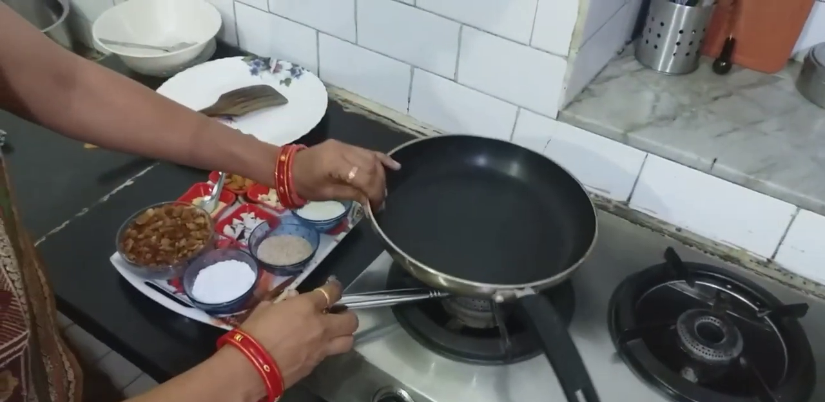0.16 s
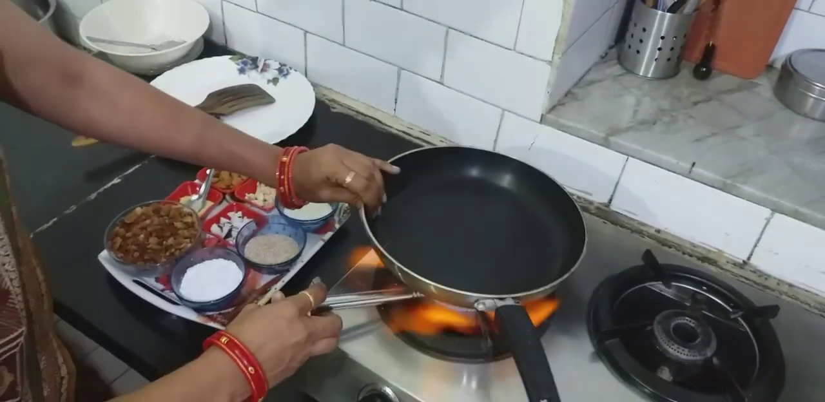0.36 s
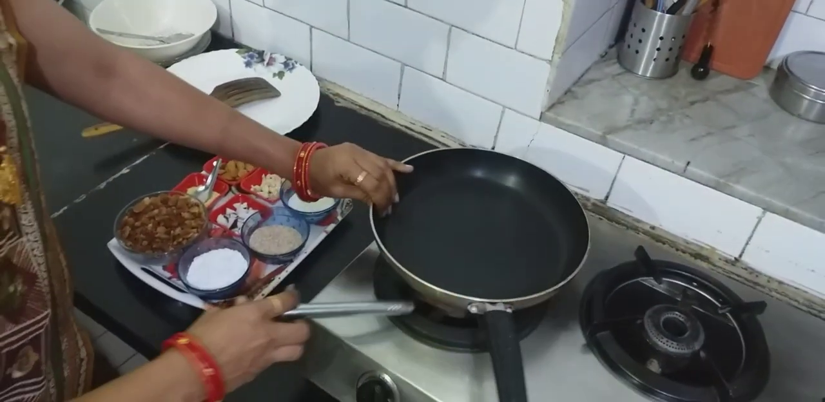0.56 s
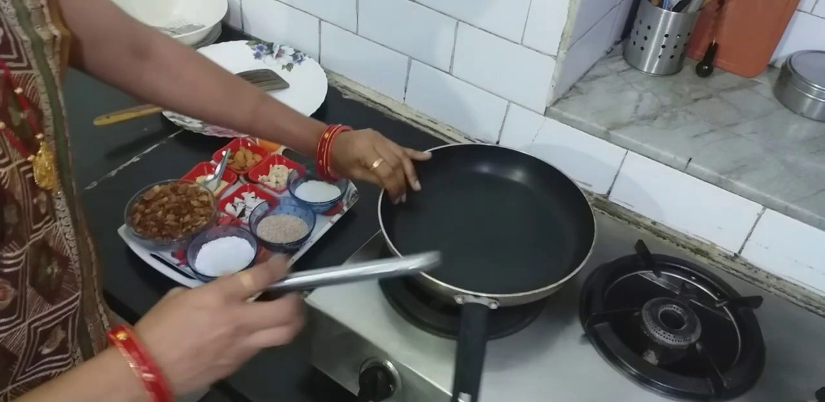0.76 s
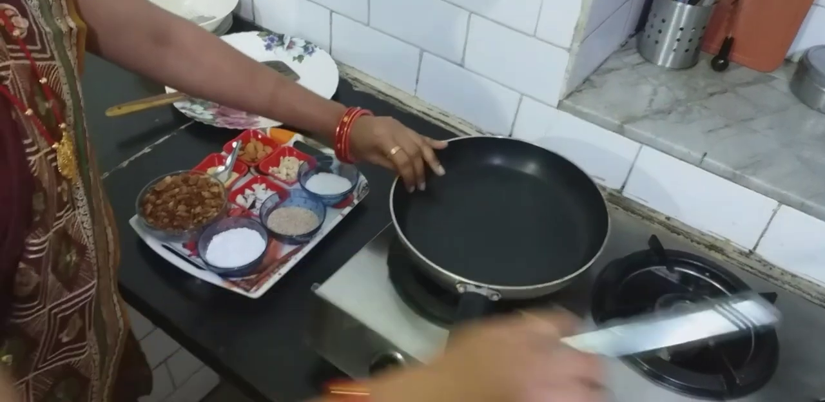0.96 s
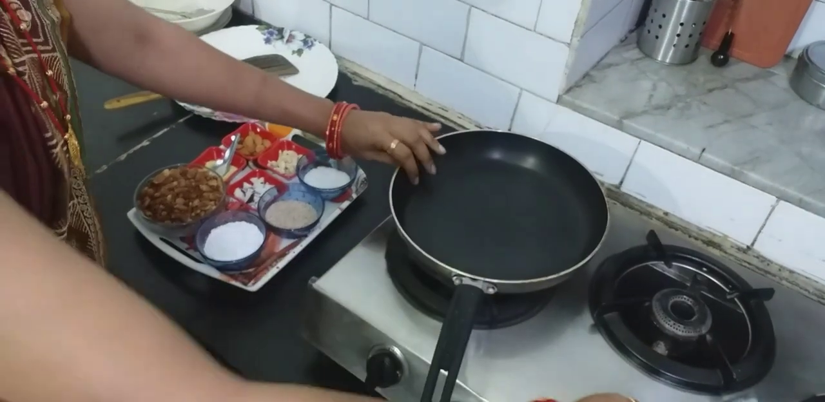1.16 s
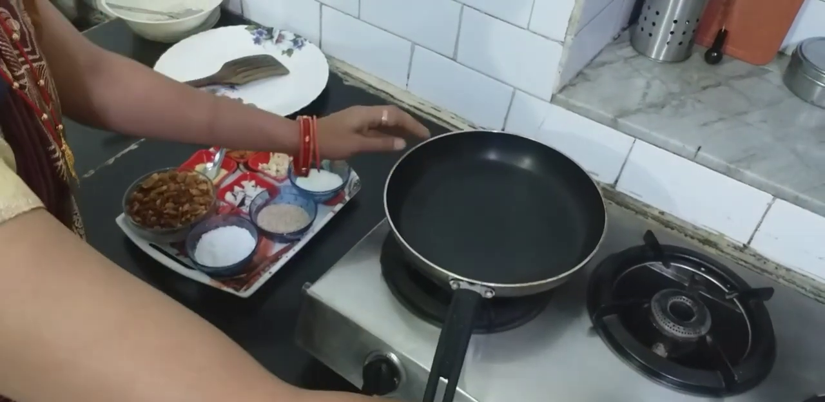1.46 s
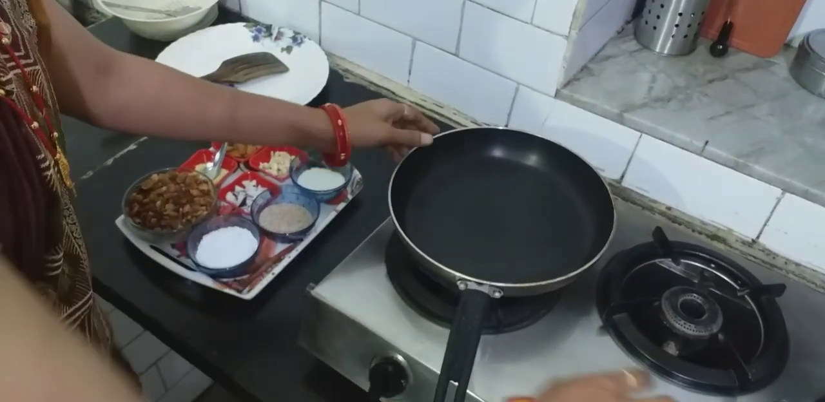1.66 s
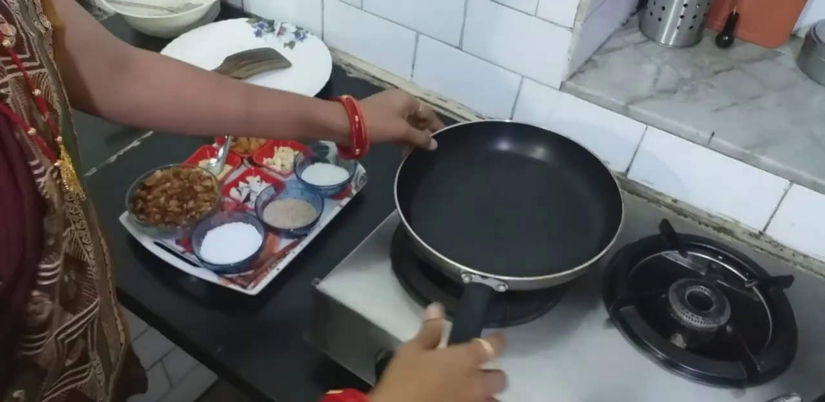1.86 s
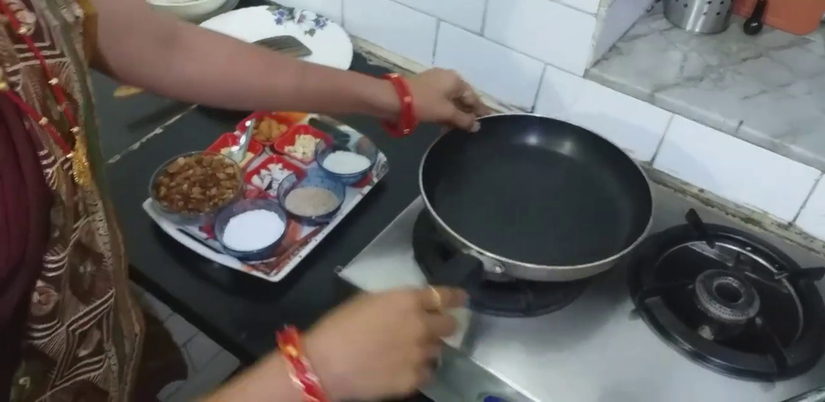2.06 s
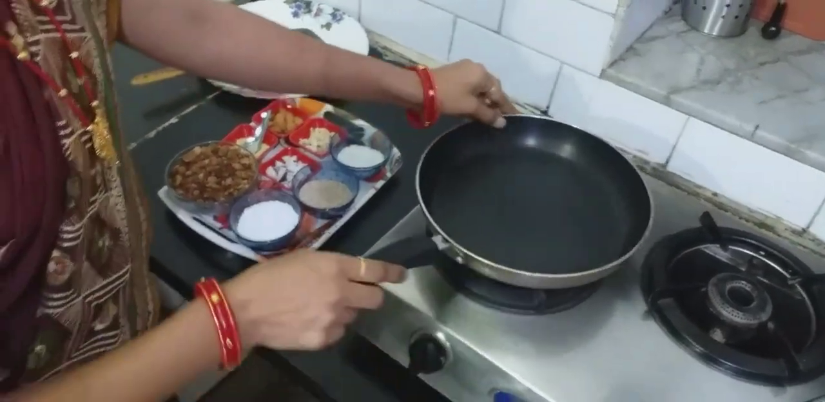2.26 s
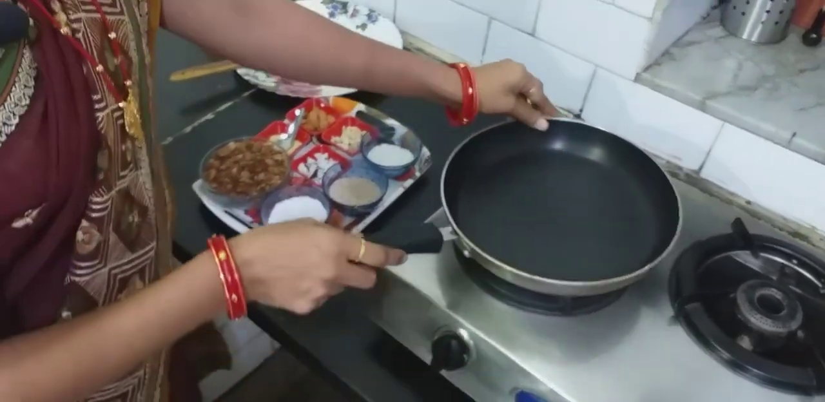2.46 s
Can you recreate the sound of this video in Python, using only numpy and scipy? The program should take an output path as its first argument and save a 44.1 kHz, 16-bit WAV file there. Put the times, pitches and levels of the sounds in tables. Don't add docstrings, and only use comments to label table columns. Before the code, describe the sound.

Frying pan knocking and scraping on a metal stove grate, after a sharp lighter click and gas puff

```python
import sys
import numpy as np
from scipy import signal
from scipy.fft import rfft, irfft
from scipy.io import wavfile
from scipy.ndimage import uniform_filter1d

SR = 44100
rng = np.random.default_rng(int(sys.argv[2]) if len(sys.argv) > 2 else 0)


def volts_from_decibels(level):
    exponent = np.asarray(level, float) / 20
    return 10 ** exponent


def inscribe(sig):
    pcm = np.round(np.clip(np.atleast_2d(sig).T, -1, 1) * 32767)
    wavfile.write(sys.argv[1], SR, pcm.astype(np.int16))


N = 114660

# frequency in Hz, level in dB.
FLOOR_TONE = [(18, -44.5), (30, -1), (221, 10), (415, -6), (600, 2), (1460, -7.5), (6720, -10), (8980, -15),
              (16000, -22.5)]
# time in seconds, level in dB.
FLOOR_LEVEL = [(0, 11.5), (.6, 15), (.95, 5), (1.28, -2.5), (1.32, 9.5), (2.3, 19.5), (2.6, 14.5)]
FLOOR_DB = -70

# start in seconds, length in seconds, level in dB, start and end pitch in Hz.
CHIRPS = [
    (.765, .12, -70, 2250, 1700),
    (1.04, .085, -73, 2200, 1700),
]
CHIRP_HARMONICS = [-13, 0, -12]

# frequency in Hz, level in dB, t60 in seconds.
STOVE_MODES = [(98.3, -7, 0.69), (117.7, -2, 0.61), (148.9, -5, 1.2), (187, 3, 0.39), (318, -8, 1.38),
               (442, -13, 0.33), (685.5, -6.5, 0.42)]
# start in seconds, level in dB.
STOVE_BLOWS = [
    (.215, -33),
    (.25, -37),
    (0.289, -40.5),
    (0.352, -43),
    (1.949, -53),
    (2.0647, -71),
]

# time in seconds, level in dB.
GAS_LEVEL = [
    (0, -55.5),
    (.08, -51.5),
    (.19, -58),
    (.26, -72.5),
    (.4, -89.5),
]
# frequency in Hz, level in dB.
GAS_TONE = [(24, -44.5), (40, -4.5), (99, 5), (329, -5.5), (503, -28), (646, -4.5), (1410, -20), (4240, 0),
            (16000, -48.5)]
# time in seconds, level in dB.
PUFF_LEVEL = [
    (.205, -58),
    (.235, -46),
    (.26, -29),
    (.3, -29.5),
    (.36, -51),
    (.6, -61.5),
    (.9, -61),
]
# frequency in Hz, level in dB.
PUFF_TONE = [(15, -50), (25, -13), (48, -16), (188, -12), (331, -23.5), (352, -53), (436, -13.5),
             (500, -26.5), (650, -45.5), (1100, -120)]

# start in seconds, level in dB, rattle in seconds, tilt in dB per octave.
SNAPS = [
    (.2045, -18.5, .00025, 3),
    (.2135, -23, 0.0042, -2),
    (.227, -32.5, 0.0014, 4.5),
]
# frequency in Hz, level in dB.
SNAP_TONE = [(180, -27), (450, -2.5), (1400, -14), (3600, -7), (5500, -5), (7500, -2), (9500, -9),
             (16000, -15)]
# start in seconds, level in dB, rattle in seconds, tilt in dB per octave.
LAID = [
    (1.3016, -36.5, 0.0038, 1),
    (1.333, -42, 0.00064, -4.5),
    (1.411, -45, 0.0031, -3.5),
]
# frequency in Hz, level in dB.
LAID_TONE = [(200, -24.5), (722, -0.5), (1000, -1.5), (2100, -10.5), (3000, -19.5), (4000, -8.5),
             (6050, -31), (7680, -17.5), (16000, -23.5)]
# start in seconds, level in dB, rattle in seconds, tilt in dB per octave.
FALL = [
    (1.53, -28.5, 0.0019, 2),
    (1.5319, -23.5, 0.00063, 1),
    (1.5339, -24.5, 0.001, 1),
    (1.5363, -23, 0.00074, -1),
    (1.5391, -24.5, 0.0019, -1),
    (1.755, -35, 0.0028, -1),
]
# frequency in Hz, level in dB.
FALL_TONE = [(59, -34), (234, -8), (836, -6.5), (1900, -10), (4100, -7.5), (7450, -13), (13000, -17.5),
             (16000, -21.5)]
# start in seconds, level in dB, rattle in seconds, tilt in dB per octave.
BANGLES = [
    (.52, -57.5, 0.003, 5.5),
]
# frequency in Hz, level in dB, t60 in seconds.
FALL_RING_MODES = [(528, -6.5, 0.82), (641, 7, 0.23), (838, 2.5, 0.52), (1052, 1, 0.38), (1157, -0.5, 0.56),
                   (1701, -4, 0.67), (2730, -18, 0.55), (3480, -1.5, 0.35), (3905, 1.5, 0.39),
                   (4129, -5, 0.28), (4730, -12, 0.31), (5080, -4, 0.22), (5200, -10, .3)]

# time in seconds, level in dB.
DRAG_PRESSURE = [
    (1.875, -72),
    (1.9, -49),
    (2.05, -50),
    (2.09, -47),
    (2.13, -49),
    (2.185, -39.5),
    (2.22, -65),
    (2.3, -73),
    (2.36, -49),
]
# frequency in Hz, width in Hz, level in dB.
DRAG_MODES = [(592, 86, -6), (860, 30, -5), (1880, 45, -8), (2230, 60, -6), (3050, 60, -3), (3990, 90, -3),
              (4880, 100, -6), (5980, 150, -9), (6850, 35, -10), (8660, 60, -15), (10100, 110, -18),
              (11700, 67, -14), (13500, 51, -16), (15400, 35, -16)]
GRIT_PER_S, GRIT_SPREAD_DB = 560, 1.5
RASP_DB, FLARE_DB = -4, 3
TREBLE_FROM_S, TREBLE_HZ = 1.99, 6500

# start in seconds, level in dB, tilt in dB per octave.
CLANKS = [
    (0.3522, -31.5, -1),
    (.367, -38.5, 4.5),
    (0.7052, -53.5, -7),
    (1.879, -41.5, 0.5),
    (1.8847, -36.5, -2),
    (1.935, -47, 0),
    (1.9504, -37.5, 0.5),
    (2.0667, -34.5, -3.5),
    (2.109, -42.5, -5.5),
    (2.3445, -41, -2),
]
# frequency in Hz, level in dB.
KNOCK_TONE = [(59, -27.5), (130, -15), (406, -5), (705, -4), (2860, -5.5), (7500, -13), (9500, -24),
              (16000, -40.5)]
KNOCK_S = 0.0011
# frequency in Hz, level in dB, t60 in seconds, twin offset in Hz,
# twin level in dB, first swell of the beat in seconds.
PAN_MODES = [(1545, -6, .5, 9, -6, 0), (1907, -8, .42, -14, -6, 0), (2206, -1.5, .5, 8, -1, .042),
             (2686, -10, .48, -7, -6, .02), (3039, 2, .46, 11, -7, 0), (3497, -10, .4, 12, -6, .03),
             (3960, -9, .45, -21, -4, 0), (4633, -9, .42, 10, -6, .03), (4960, -10, .52, -93, -2, 0),
             (5911, -7, .48, -34, -5, 0), (6165, -7, .46, -28, -1, 0), (7227, -8, .36, -19, -4, .02),
             (10250, -18, .17, -190, -6, 0), (11820, -18, .17, -30, -6, 0)]
PAN_DB = -23
# start in seconds, frequency in Hz, level in dB, t60 in seconds.
TOUCHES = [(.3523, 695, -39, 0.47), (.3523, 852, -41, 0.33), (0.3525, 1073, -41, 0.24),
           (.575, 5990, -50.5, 0.1), (.615, 7667, -55, 0.12), (.7045, 675.5, -52, .5),
           (.712, 561, -53.5, 0.6), (1.8843, 4000, -36.5, 0.21), (1.8843, 2254, -36, 0.078),
           (1.8843, 1920, -37, 0.17), (1.8843, 6080, -40.5, 0.23), (1.894, 6090, -35, 0.068),
           (1.894, 4100, -33, 0.11), (1.9, 689, -39.5, 0.15), (1.934, 5800, -37, 0.15),
           (1.938, 3990, -36, 0.096), (1.951, 3020, -40.5, 0.62), (1.951, 2196, -37, 0.21),
           (1.951, 4160, -34, 0.05), (1.951, 313, -45.5, 0.53), (1.951, 1529, -43.5, 0.35),
           (1.955, 445, -39.5, 0.18), (1.97, 700.4, -38.5, 0.3), (2.0664, 534, -34, 0.21),
           (2.0664, 664, -36.5, 0.25), (2.0664, 847, -38, 0.32), (2.0664, 985, -38.5, 0.27),
           (2.0664, 1136, -38, 0.085), (2.0664, 1674, -39.5, 0.11), (2.0664, 1846, -35.5, 0.18),
           (2.0664, 320, -48.5, 1.6), (2.109, 587, -36.5, 0.1), (2.18, 4850, -40.5, 0.21),
           (2.005, 3050, -42.5, 0.43), (2.058, 3086, -40, .2), (2.21, 3050, -46, 0.22),
           (2.01, 2210, -40, .2), (2.15, 6860, -49, 0.21), (2.185, 3950, -48, 0.22),
           (2.3442, 655, -48.5, 0.22), (2.3442, 4250, -37, 0.038), (2.3442, 2140, -41.5, 0.051)]
# start in seconds, level in dB, rattle in seconds,
# tilt in dB per octave.
TICKS = [
    (1.501, -51.5, 0.0022, 0),
    (1.531, -18.5, 0.0057, 4.5),
    (1.757, -39, .01, 5),
    (1.95, -53, 0.0027, -1),
    (2.3442, -49.5, 0.005, 1),
]
TICK_WET_DB = 0.5
FREE_WET_DB, FREE_BUZZ = -13, .2
BUZZ = .6

RISE_S = .0015
SPLIT, TWIN_DB = .005, -6
RING_WET_DB = -10

# frequency in Hz, t60 in seconds.
ROOM = [(60, 1), (250, 0.4), (700, 0.85), (2000, 0.62), (5000, 0.43), (9000, 0.31), (15000, 0.25)]
WET_DB, FIRST_ECHO_S, BUILD_S = 8.5, 0.0005, 0.00088
LATE_DB, LATE_STRETCH = -22.5, 1.9

# frequency in Hz, level in dB.
MIC = [(30, -26), (62, -3), (6500, -0.5), (7800, 2), (9200, -8), (10500, -1), (15700, 1), (16100, -40)]
# frequency in Hz, level in dB.
SIDE_TONE = [(4000, -5.5), (15000, -6)]
# frequency in Hz, share from 0 to 1.
SIDE_SHARE = [(4500, 0), (6000, 0.06), (8500, 0.01), (12000, .45), (15000, .5)]


def evened(x):
    return x / np.sqrt(np.mean(x ** 2) + 1e-20)


def wobble(count, size):
    return evened(uniform_filter1d(rng.standard_normal(count), size=size))


def read(points, hz):
    f, value = np.transpose(points)
    return np.interp(np.log(hz + 1), np.log(f + 1), value)


def level(points):
    s, db = np.transpose(points)
    return volts_from_decibels(np.interp(np.arange(N) / SR, s, db, left=-150, right=-150))


def add(mix, s, sound):
    part = mix[round(s * SR):][:len(sound)]
    part += sound[:len(part)]


def colour(tone, tilt_db=0.):
    hz = np.abs(np.fft.fftfreq(8192, 1 / SR))
    log_gain = np.log(volts_from_decibels(read(tone, hz) + tilt_db * np.log2((hz + 500) / 2000)))
    taps = np.fft.ifft(np.exp(np.conj(signal.hilbert(log_gain)))).real
    if abs(taps[1]) <= abs(taps[-1]):
        taps = np.roll(taps[::-1], 1)
    taps = taps[:4096]
    return taps / np.linalg.norm(taps)


def noise(tone):
    hiss = signal.oaconvolve(rng.standard_normal(N + 4096), colour(tone))
    return evened(hiss[4096:N + 4096])


def resonate(x, hz, width):
    pole = np.exp((2j * np.pi * hz - np.pi * width) / SR)
    return 2 * signal.lfilter([1 - abs(pole)], [1, -pole], x).real


def in_room(x, wet_db=WET_DB):
    hz, _, z = signal.stft(rng.standard_normal(SR), SR, nperseg=256)
    t = np.arange(z.shape[1]) * 128 / SR
    t60 = read(ROOM, hz)[:, None]
    z = z * (volts_from_decibels(-60 * t / t60) + volts_from_decibels(LATE_DB - 60 * t / (LATE_STRETCH * t60)))
    tail = signal.istft(z, SR, nperseg=256)[1]
    tail = tail * np.clip((np.arange(len(tail)) / SR - FIRST_ECHO_S) / BUILD_S, 0, 1)
    tail = volts_from_decibels(wet_db) * tail / np.linalg.norm(tail)
    tail[0] = 1
    return signal.fftconvolve(x, tail)


def knock(db, rattle_s, tone, tilt_db):
    fade = np.exp(-np.arange(2048) / SR / rattle_s)
    spread = rfft(rng.standard_normal(len(fade)) * fade)
    burst = irfft(spread / abs(spread)) * fade ** (1 / 3)
    burst = burst / np.linalg.norm(burst)
    return volts_from_decibels(db + 22.5) * signal.fftconvolve(burst, colour(tone, tilt_db))


def ring(modes, db, uneven_db=0., lasting=0.86):
    t = np.arange(int(SR * lasting * 3 / 4))[:, None] / SR
    hz, mode_db, t60, *twin = np.transpose(modes)
    luck = rng.standard_normal((len(modes), 2))
    offset, twin_db, swell_s = twin or (hz * SPLIT * luck[:, 1], TWIN_DB, 0)
    pair = np.sin(2 * np.pi * hz * t)
    pair = pair + volts_from_decibels(twin_db) * np.sin(2 * np.pi * (hz * t + offset * (t - swell_s)))
    rise = 1 - np.exp(-t / RISE_S)
    decay = np.exp(-np.log(1000) * t / (lasting * t60))
    return (pair * rise * decay) @ volts_from_decibels(db + mode_db + uneven_db * luck[:, 0])


def room_floor():
    return volts_from_decibels(FLOOR_DB) * level(FLOOR_LEVEL) * noise(FLOOR_TONE)


def bird():
    out = np.zeros(N)
    for s, length, db, start_hz, end_hz in CHIRPS:
        u = np.arange(0, length, 1 / SR) / length
        flutter = 1 + .03 * wobble(8820, 90)[:len(u)]
        pitch = start_hz + (end_hz - start_hz) * u ** (4 / 3)
        turns = np.cumsum(flutter * pitch) / SR
        call = sum(volts_from_decibels(p) * np.sin(2 * np.pi * (k + 1) * turns) for k, p in enumerate(CHIRP_HARMONICS))
        add(out, s, in_room(volts_from_decibels(db - 13.0) * call * np.sin(np.pi * u), 23.8))
    return out


def stove():
    out = np.zeros(N)
    for s, db in STOVE_BLOWS:
        add(out, s, ring(STOVE_MODES, db, uneven_db=0.92))
    return out


def burner():
    sputter = volts_from_decibels(2.0 * wobble(N, 150))
    hiss = level(GAS_LEVEL) * noise(GAS_TONE) * sputter
    return hiss + level(PUFF_LEVEL) * noise(PUFF_TONE)


def lighter():
    out = np.zeros(N)
    for rows, tone in ((SNAPS, SNAP_TONE), (LAID, LAID_TONE), (FALL, FALL_TONE), (BANGLES, SNAP_TONE)):
        for s, db, rattle_s, tilt_db in rows:
            add(out, s, in_room(knock(db, rattle_s, tone, tilt_db)))
    add(out, FALL[0][0], in_room(ring(FALL_RING_MODES, -32, lasting=1.0), RING_WET_DB))
    return out


def drag():
    t = np.arange(N) / SR
    grit = volts_from_decibels(GRIT_SPREAD_DB * np.minimum(rng.exponential(1, N), 3)) * rng.standard_normal(N)
    grit = grit * (rng.random(N) < GRIT_PER_S / SR)
    rings = 0
    for hz, width, db in DRAG_MODES:
        flare_db = FLARE_DB * np.interp(t, np.arange(53) / 20, rng.standard_normal(53))
        awake = np.clip((t - TREBLE_FROM_S) * 20, .05, 1) if hz > TREBLE_HZ else 1
        mode = evened(resonate(grit, hz, width))
        rings = rings + volts_from_decibels(db) * np.sqrt(width) * volts_from_decibels(flare_db) * awake * mode
    rasp = evened(signal.oaconvolve(grit, colour(KNOCK_TONE))[:N])
    scrape = evened(rings) + volts_from_decibels(RASP_DB) * rasp
    return in_room(level(DRAG_PRESSURE) * volts_from_decibels(-3.5) * scrape)[:N]


def pan():
    out, tones = np.zeros(N), np.zeros(N)
    free = ring(PAN_MODES, PAN_DB)
    free = free * (1 + FREE_BUZZ * wobble(len(free), 300))
    add(out, CLANKS[0][0], in_room(free, FREE_WET_DB))
    for s, hz, db, t60 in TOUCHES:
        tone = ring([(hz, 0, t60)], db)
        add(tones, s, tone * (1 + BUZZ * wobble(len(tone), 300)))
    for s, db, tilt_db in CLANKS:
        add(out, s, in_room(knock(db, KNOCK_S, KNOCK_TONE, tilt_db)))
    for s, db, rattle_s, tilt_db in TICKS:
        add(out, s, in_room(knock(db, rattle_s, FALL_TONE, tilt_db), TICK_WET_DB))
    return out + in_room(tones, RING_WET_DB)[:N]


def scene():
    mix = room_floor() + bird() + stove() + burner() + lighter() + drag() + pan()
    return np.array([mix, mix])


def roll_off(x):
    return signal.sosfilt(signal.butter(12, 16810, fs=SR, output="sos"), x)


def record(dry):
    mid = signal.oaconvolve(dry[0], colour(MIC))[:N]
    hz, t, z = signal.stft(mid, SR, nperseg=1024)
    spin = np.exp(2j * np.pi * rng.random(z.shape))
    lots = np.kron(rng.random((33, len(t) // 6 + 1)), np.ones((16, 6)))[:len(hz), :len(t)]
    apart = lots < read(SIDE_SHARE, hz)[:, None]
    side = z * spin * apart * volts_from_decibels(read(SIDE_TONE, hz))[:, None]
    side = signal.istft(side, SR, nperseg=1024)[1][:N]
    return roll_off(np.array([mid + side, mid - side]))


dry = scene()
out = record(dry)
inscribe(out)
```